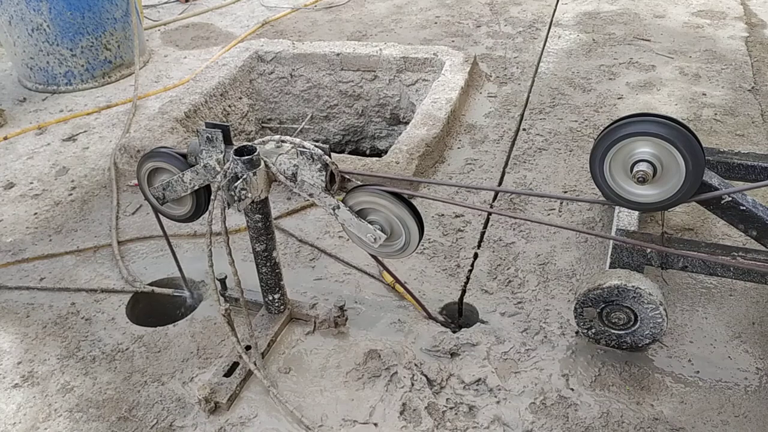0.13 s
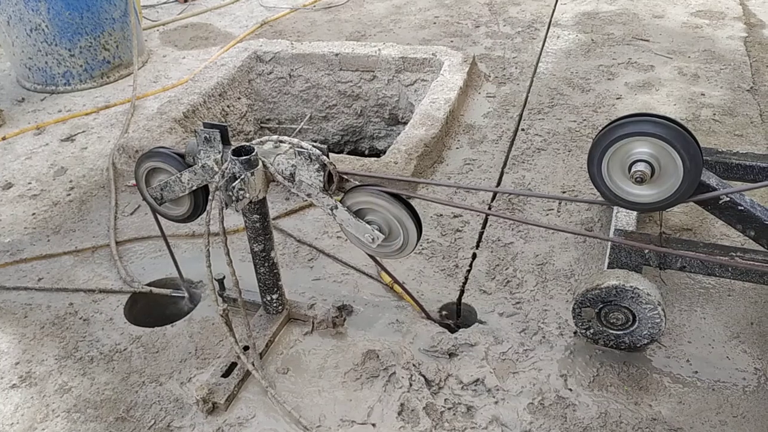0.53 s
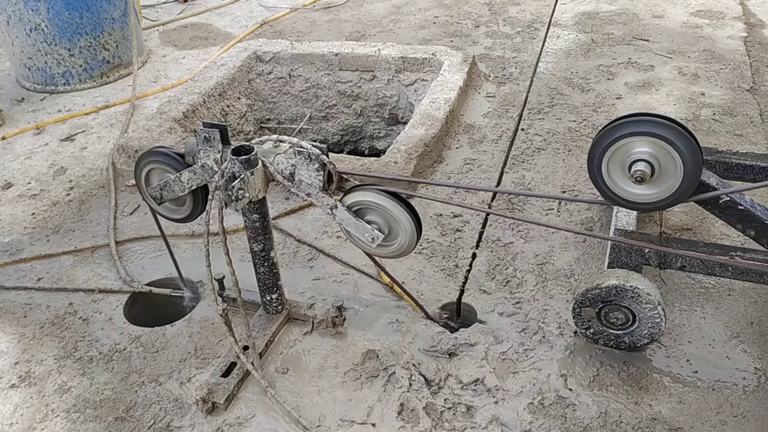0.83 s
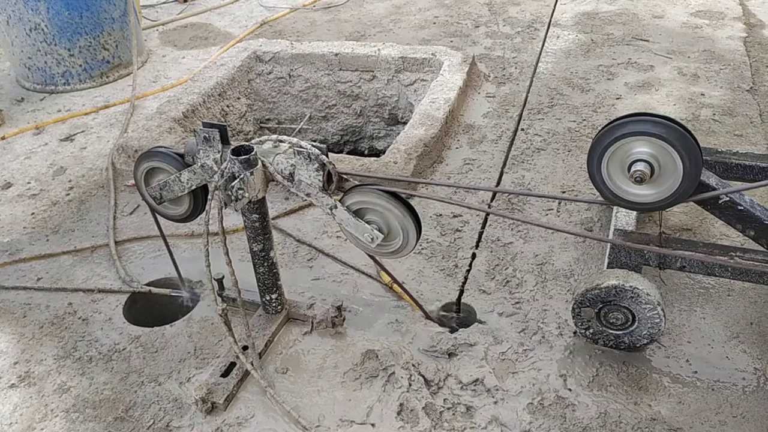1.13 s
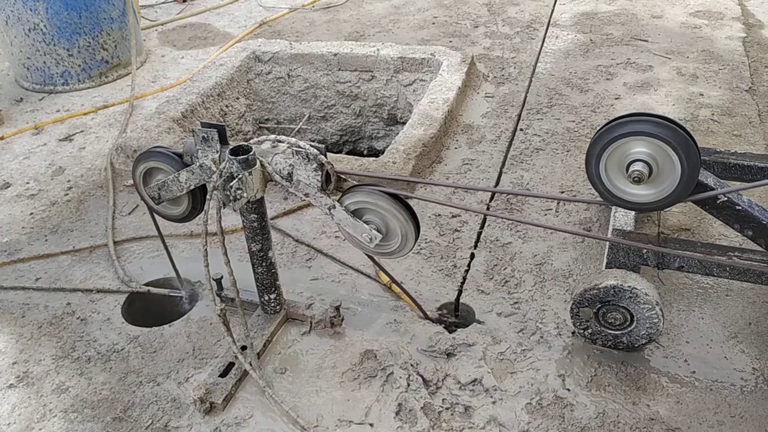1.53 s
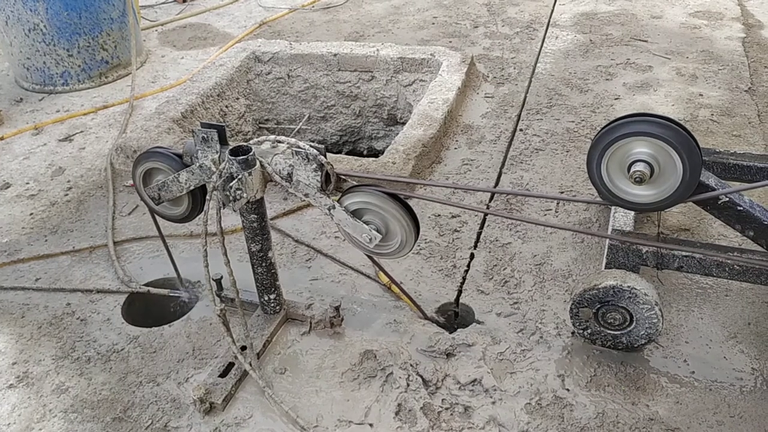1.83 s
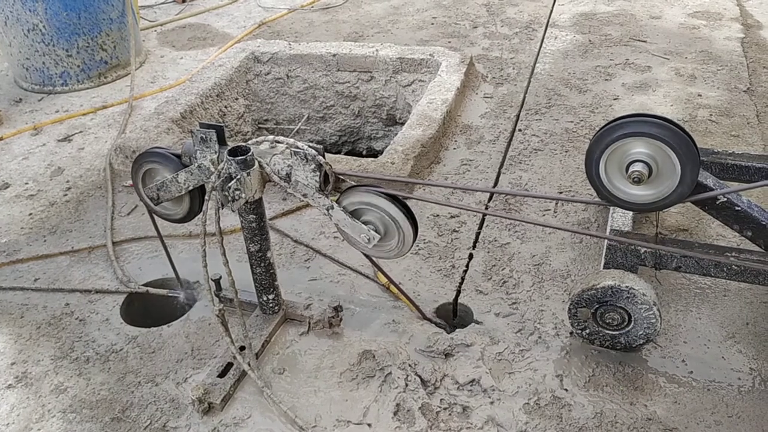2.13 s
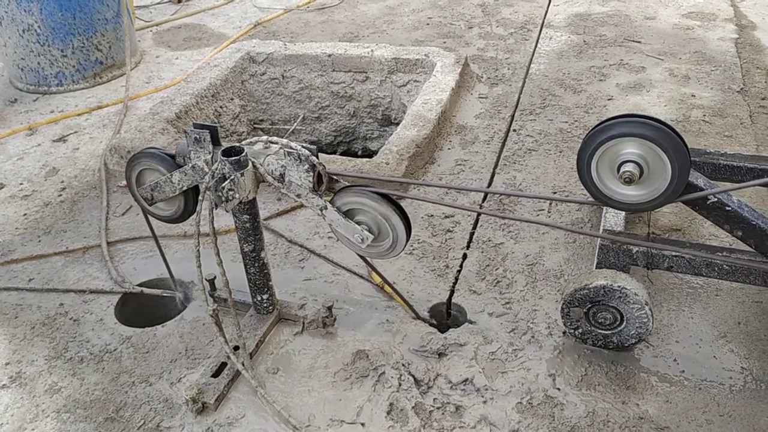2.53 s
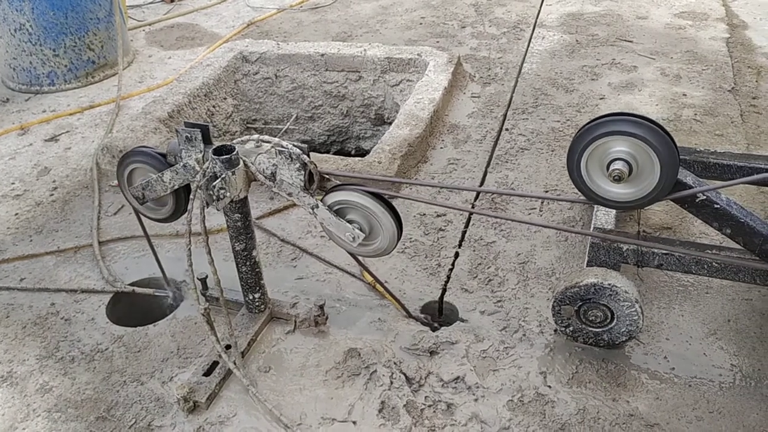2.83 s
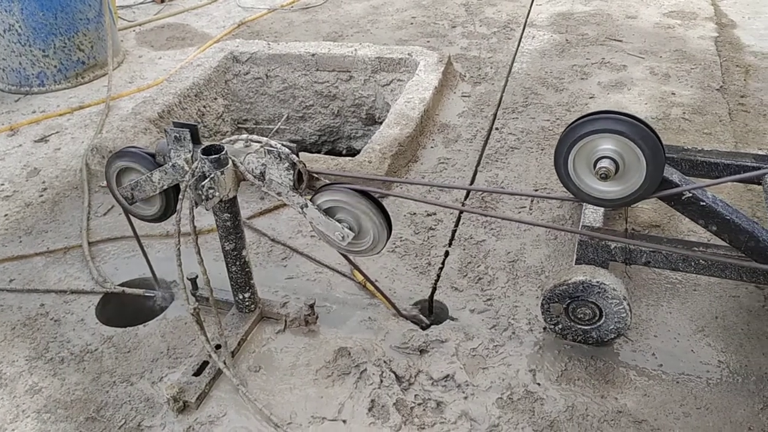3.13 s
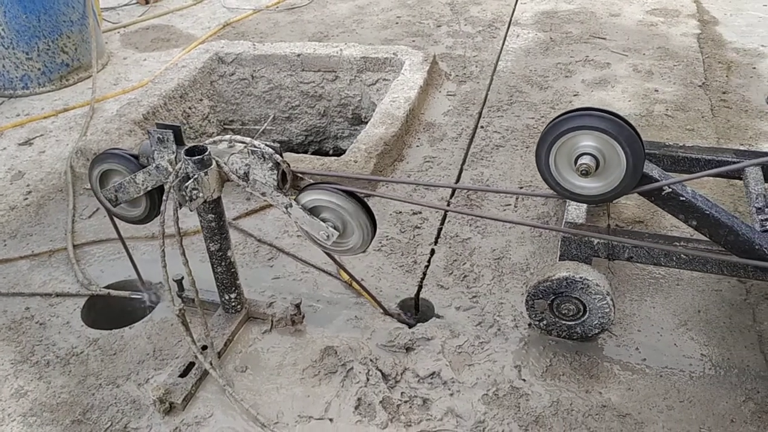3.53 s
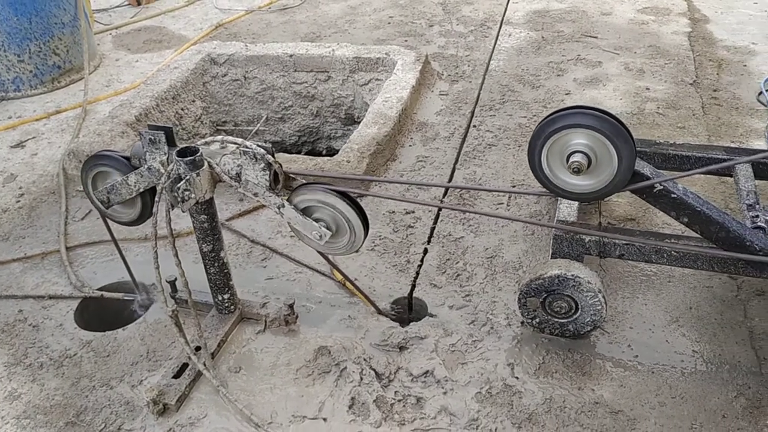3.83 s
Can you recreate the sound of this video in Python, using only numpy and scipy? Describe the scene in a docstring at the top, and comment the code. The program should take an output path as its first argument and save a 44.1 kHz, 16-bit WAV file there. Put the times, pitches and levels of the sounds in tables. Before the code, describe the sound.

Concrete-cutting wire saw running continuously, harsh gritty grinding and hissing over a fast mechanical rattle.

```python
"""A diamond wire saw cuts a wet concrete slab, heard from beside its guide pulleys, almost wholly on the left.
Filtered random grains make the beads' grind and hiss, and a tone at their passing rate makes their hum.
A worn pulley rubs at fixed places of each turn and rattles its steel stand, a set of resonances.
Noise-driven resonances make the taut wire sing, with its balance and level changing in the second half.
Below and above lie the drive's throbbing rumble and thin whine; short rasps mark hard grit."""
import sys
import numpy as np
from scipy import signal
from scipy.fft import rfft, irfft
from scipy.io import wavfile

SR = 44100
rng = np.random.default_rng(int(sys.argv[2]) if len(sys.argv) > 2 else 0)


def master(y):
    """Save y as 16-bit WAV."""
    cut = np.clip(np.atleast_2d(y).T, -1, 1)
    pcm = np.round(cut * 32767)  # scale
    wavfile.write(sys.argv[1], SR, pcm.astype(np.int16))


N = 176400  # samples, 4 s


def undb(db):
    """Level is logarithmic: 20 dB is a factor of ten in amplitude."""
    return 10 ** (np.asarray(db) / 20)


def unit(x):
    """Normalisation of the effective amplitude: scale to rms 1."""
    return x / np.sqrt(np.mean(x ** 2))


def clock():
    """Uniform sampling: the time of every sample in seconds."""
    return np.arange(N) / SR


def curve(rows):
    """Linear interpolation between (s, value) rows."""
    return np.interp(clock(), *np.array(rows).T)


def bins():
    """Fourier analysis: the frequency of every spectral bin in Hz, kept above zero."""
    return np.maximum(np.arange(N // 2 + 1), 1) * SR / N


def colour(x, rows):
    """Spectral shaping: gain in dB interpolated over log frequency between (Hz, dB) rows."""
    hz, db = np.array(rows).T
    gain = undb(np.interp(np.log(bins()), np.log(hz), db))
    return irfft(rfft(x) * gain, N)


def ring(x, hz, width):
    """Simple resonance: a damped oscillator of the given half-power width, gain 1 at its centre."""
    f = bins()
    response = 1 / (1 + 1j * (f * f - hz * hz) / (f * width))
    return irfft(rfft(x) * response, N)


def ring_twice(x, hz, width):
    """Cascaded resonance: two equal oscillators give steeper skirts, scaled to rms 1."""
    return unit(ring(ring(x, hz, width), hz, width))


def noise():
    """White noise: equal mean power at all frequencies."""
    return rng.standard_normal(N)


def walk(rate):
    """Low-passed noise: a smooth random wander of rms 1, mostly slower than rate in Hz."""
    return unit(irfft(rfft(noise()) * np.exp(-(bins() / rate) ** 2), N))


def grains(rate, spread_db):
    """Shot noise: random clicks, rate per second on average, few of them large, scaled to rms 1."""
    size = undb(spread_db * np.minimum(rng.exponential(size=N), 2 * np.pi))
    struck = rng.random(N) < rate / SR
    return unit(struck * size * np.sign(noise()))


def bite():
    """Contact force: how hard the wire bites, 0 at first and 1 in the second half."""
    rise_from_s, rise_s = 2.2, 0.6
    return np.clip((clock() - rise_from_s) / rise_s, 0, 1)


# Echoes of the cut off the slab and frame. Each row: delay in seconds, level in dB re the direct sound.
ECHO_PATHS = [(.0029, -17), (.0074, -17), (.0131, -18), (.023, -19)]


def echoes(x):
    """Reflection: delayed weaker copies join the direct sound, and the sum is scaled to rms 1."""
    reflected = sum(undb(db) * np.roll(x, int(delay * SR)) for delay, db in ECHO_PATHS)
    return unit(x + reflected)


BEADS_PER_TURN = 23.5  # beads passing per pulley turn
GRAINS_PER_S, GRAIN_SPREAD_DB = 9000, 1
GRIND_DB, HISS_DB = 0.5, 1.5  # added to the level curves
SURGE_DB = .5  # rms, uneven feed of the wire
BEAD_DEPTH = 0.11  # share of the grain size
PING_HZ, PING_WIDTH_HZ, PING_DB, PINGS_PER_S = 6094, 270, -36, 90  # beads clinking; width of each pass
# Spectrum of grinding in the cut. Each row: frequency in Hz, relative level in dB per Hz.
GRIND_SPECTRUM = [(300, -12.5), (600, 1.5), (950, 0.5), (1100, -3.5), (1550, 1.5), (1900, -4), (2200, 0),
                  (2900, 0), (3700, -1), (4500, -4.5), (5200, -12), (7000, -52)]
# Course of the grinding. Each row: time in seconds, level in dB before GRIND_DB.
GRIND_LEVEL = [(.42, -26.5), (.9, -26.5), (1.3, -27), (2, -26.5), (2.24, -24.8), (2.45, -26), (2.7, -25.5),
               (3.3, -26), (4, -27)]
# Spectrum of the hiss of grit and spray. Each row: frequency in Hz, relative level in dB per Hz.
HISS_SPECTRUM = [(3500, -26), (5200, -11), (5750, 1.5), (6300, 0.5), (6850, -2), (7300, 0.5), (8200, -1),
                 (8800, 2.5), (10100, 1), (11200, -7), (12200, -11), (12700, -20), (14200, -15.5),
                 (15700, -62)]
# Course of the hiss. Each row: time in seconds, level in dB before HISS_DB.
HISS_LEVEL = [(.42, -25), (1, -24.5), (1.5, -25.5), (2.04, -25), (2.2, -24), (3.75, -24), (4, -26.5)]


def cutting(turns):
    """Granular fracture: crushed grit grinds in step with the pulley, and spray hisses at the bead rate."""
    grind = echoes(colour(grains(GRAINS_PER_S, GRAIN_SPREAD_DB), GRIND_SPECTRUM))
    grind = grind * undb(curve(GRIND_LEVEL) + GRIND_DB + SURGE_DB * walk(rate=12))
    # the pull on the wire varies once and twice per turn
    tug = 1 + 0.053 * np.cos(2 * np.pi * turns) + .05 * np.sin(4 * np.pi * turns)

    bead_beat = 1 + BEAD_DEPTH * np.cos(2 * np.pi * BEADS_PER_TURN * turns)
    hiss = echoes(colour(grains(rate=16000, spread_db=2.0) * bead_beat, HISS_SPECTRUM))
    hiss = hiss * undb(curve(HISS_LEVEL) + HISS_DB)

    flutter = undb(.5 * walk(rate=46))
    pings = ring_twice(grains(PINGS_PER_S, spread_db=1.5), PING_HZ, PING_WIDTH_HZ)
    return (grind * tug + hiss) * flutter + undb(PING_DB) * pings


HUM_DB, HUM_WAVER_DB = -42, 1.2  # level between the rough stretches; rms waver
HUM_WANDER = 0.0085  # rms share of the pitch
LAP_S, LAP_AT_S = .679, 0.538  # one round of the wire loop, and when a lap starts
# Rough stretches of the loop. Each row: seconds into the lap, half length in seconds (to 1/e), level in dB.
ROUGH_STRETCHES = [(0, 0.073, -33), (0.171, 0.054, -33)]


def bead_hum(speed):
    """Periodic excitation: beads over the pulleys hum at their passing rate, swelling twice each lap."""
    hz = BEADS_PER_TURN * speed * (1 + HUM_WANDER * walk(rate=13))
    tone = np.sqrt(2) * np.sin(2 * np.pi * np.cumsum(hz) / SR)
    swell = 0
    for at, length, db in ROUGH_STRETCHES:
        # time from the nearest pass of this stretch
        since = (clock() - LAP_AT_S - at + LAP_S / 2) % LAP_S - LAP_S / 2
        swell = swell + undb(db) * np.exp(-(since / length) ** 2)
    level = np.hypot(swell, undb(HUM_DB))
    return tone * level * undb(HUM_WAVER_DB * walk(rate=20))


RUB_SCATTER_DB, RUB_JITTER_S = 1.0, .00004  # rms change from turn to turn
RUB_ROUGH_EARLY, RUB_ROUGH_LATE, RUB_FLUTTER_HZ = .13, .3, 40  # roughness as a share of the judder
STAND_DB, STAND_STEADY = -37, .02  # stand level; contact that never ceases
# Rubs within each turn of the pulley. Each row: place as a share of the turn, half length in seconds
# (to 1/e), pitch in Hz, level in dB before the rattle curve.
RUB_PLACES = [(0.013, 0.0049, 824, 1.5), (.24, 0.0064, 787, -4), (0.59, 0.0041, 734, -2.5),
              (.64, 0.0048, 889, -6), (.85, 0.013, 780, -8), (0.95, 0.0058, 573, -5),
              (0.1391, 0.0074, 570, -7), (.78, 0.0077, 190, -16.5)]
# Course of the rubs. Each row: time in seconds, level in dB.
RUB_LEVEL = [(.4, -22), (1.25, -22.8), (1.9, -22), (2.2, -25.5), (3.3, -25.5), (4, -23.5)]
# Modes of the steel pulley stand. Each row: frequency in Hz, width in Hz, relative level in dB.
STAND_MODES = [(567, 14, -10), (605, 23, -2), (713, 43, -6.5), (776, 11, 9.5), (862, 70, 0), (940, 97, -13)]


def pulley(turns, speed):
    """Forced vibration: rubs at fixed places of each turn judder at their pitch and excite the stand's modes."""
    rough = RUB_ROUGH_EARLY + (RUB_ROUGH_LATE - RUB_ROUGH_EARLY) * bite()
    rubs, contact = 0, STAND_STEADY
    for place, length, hz, db in RUB_PLACES:
        nearest = np.round(turns - place).astype(int)
        # each turn draws its own lateness and size
        late, size = rng.standard_normal((N // 1000, 2))[nearest].T
        since = (turns - place - nearest) / speed + RUB_JITTER_S * late
        angle = 2 * np.pi * hz * since
        in_phase = np.cos(angle) * (1 + rough * walk(RUB_FLUTTER_HZ))
        quadrature = np.sin(angle) * rough * walk(RUB_FLUTTER_HZ)
        press = undb(db + RUB_SCATTER_DB * size) * np.exp(-(since / length) ** 2)
        rubs = rubs + np.sqrt(2) * (in_phase + quadrature) * press
        contact = contact + press ** 2
    stand = sum(undb(db) * ring(noise() * contact, hz, width) for hz, width, db in STAND_MODES)
    band = signal.butter(2, [490, 1050], "band", fs=SR, output="sos")
    stand = signal.sosfilt(band, stand)
    return rubs * undb(curve(RUB_LEVEL)) + undb(STAND_DB) * unit(stand)


RUMBLE_DB, RUMBLE_THROB = -34.5, 0.083  # throb as a share of the amplitude
WHINE_EARLY_DB, WHINE_WAVER_DB = -6, 2  # change while the bite is 0; rms waver
# Spectrum of the drive rumble. Each row: frequency in Hz, relative level in dB per Hz.
RUMBLE_SPECTRUM = [(15, -37), (45, -2.5), (85, -7.5), (125, -6), (160, 3.5), (208, 5), (240, -6.5),
                   (270, -4), (300, -5), (372, 4.5), (400, -0.5), (480, -28.5), (800, -20)]
# Whine of the motor's inverter. Each row: frequency in Hz, mean level in dB at full bite.
WHINE_TONES = [(3984, -42.5), (4016, -49), (4081, -47.5), (4177, -45)]


def drive(turns):
    """Amplitude modulation: rumble throbs once per turn, under inverter tones of wavering level and phase."""
    throb = 1 - RUMBLE_THROB * np.sin(2 * np.pi * turns)
    rumble = unit(colour(noise(), RUMBLE_SPECTRUM)) * throb
    whine = 0
    for hz, db in WHINE_TONES:
        level = undb(db + WHINE_EARLY_DB * (1 - bite()) + WHINE_WAVER_DB * walk(rate=1.4))
        phase = 2 * np.pi * hz * clock() + 0.68 * walk(rate=3.9)
        whine = whine + np.sqrt(2) * level * np.sin(phase)
    return undb(RUMBLE_DB) * rumble + whine


# Ringing of the taut wire. Each row: frequency in Hz, nominal width in Hz, level in dB early,
# level in dB late.
WIRE_MODES = [(1375, 21, -50, -41), (1747, 51, -48, -38), (2443, 54, -43.5, -34.5), (3102, 120, -38.5, -44),
              (6370, 130, -39.5, -38), (8760, 130, -39, -51), (8810, 80, -44, -48),
              (9510, 180, -34.5, -34.5)]


def wire():
    """Friction-driven resonance: rubbing noise rings the wire's modes, whose levels shift with the bite."""
    singing = 0
    for hz, width, early_db, late_db in WIRE_MODES:
        # each pass is wider, as two in a row narrow the peak
        mode = ring_twice(noise(), hz, 1.4 * width)
        level_db = early_db + (late_db - early_db) * bite() + walk(rate=5)
        singing = singing + mode * undb(level_db)
    return singing


# Hard grit catching. Each row: centre in seconds, half length in seconds (to 1/e), centre frequency in Hz,
# nominal width in Hz, peak level in dB.
GRIT_CATCHES = [(0.852, 0.014, 3110, 300, -26.5), (0.997, .018, 6770, 1000, -21.5),
                (.995, .008, 3100, 400, -27), (2.647, 0.0081, 2920, 201, -26),
                (2.645, 0.0088, 4300, 250, -28.5), (2.783, 0.011, 6000, 500, -23)]


def scrapes():
    """Transient excitation: band noise under a short bell-shaped envelope rasps where a bead catches grit."""
    rasps = 0
    for at, length, hz, width, db in GRIT_CATCHES:
        envelope = undb(db) * np.exp(-((clock() - at) / length) ** 2)
        rasps = rasps + ring_twice(noise(), hz, 1.6 * width) * envelope
    return rasps


START_TURN = .42  # share of a turn
LEFT_DB, LEAK_DB, RIGHT_NOISE_DB = 5.5, -46, -62.5  # saw gain on the left and on the right; noise level
# Pulley speed. Each row: time in seconds, speed in turns per second.
PULLEY_SPEED = [(.4, 14.9), (.8, 14.96), (1.15, 15.2), (1.5, 15.03), (1.8, 15.15), (2.25, 14.66),
                (2.5, 14.96), (2.8, 14.66), (3.1, 14.92), (3.45, 15.1), (3.8, 14.75)]
# Spectrum of the faint noise on the right. Each row: frequency in Hz, relative level in dB per Hz.
RIGHT_SPECTRUM = [(30, 8), (150, -7), (400, -11), (1200, -15), (3000, -26.5), (8000, -40), (15000, -41)]


def scene():
    """Superposition: all sources add on the left, with a dull trace of them and faint noise on the right."""
    speed = curve(PULLEY_SPEED)
    turns = START_TURN + np.cumsum(speed) / SR
    saw = cutting(turns) + bead_hum(speed) + pulley(turns, speed) + drive(turns) + wire() + scrapes()
    left = undb(LEFT_DB) * saw
    trace = undb(LEAK_DB) * ring(saw, 690, 500)
    right = trace + undb(RIGHT_NOISE_DB) * unit(colour(noise(), RIGHT_SPECTRUM))
    return np.array([left, right])


START_S, FADE_S = .3765, 0.0019  # silence before the sound cuts in; its fade
THUMP_HZ, THUMP_S, THUMP_DB = 30, 0.044, -20  # decay time to 1/e; peak level before decay
TOP_HZ = 15800


def record(dry):
    """Saturation and low-pass filtering: sound cuts in with a low thump, peaks are rounded, the top is cut."""
    since = np.maximum(clock() - START_S, 0)
    thump = undb(THUMP_DB) * np.sin(2 * np.pi * THUMP_HZ * since) * np.exp(-since / THUMP_S)
    left_only = np.outer([1, 0], thump)
    live = (dry + left_only) * np.minimum(since / FADE_S, 1)
    live = live / (1 + (live / .8) ** 8) ** (1 / 8)  # approaches 0.8 of full scale
    low_pass = signal.ellip(10, .2, 80, TOP_HZ, fs=SR, output="sos")
    return signal.sosfilt(low_pass, live)


dry = scene()
out = record(dry)
master(out)
```